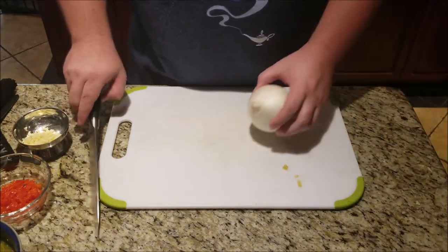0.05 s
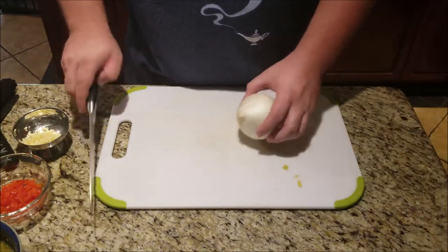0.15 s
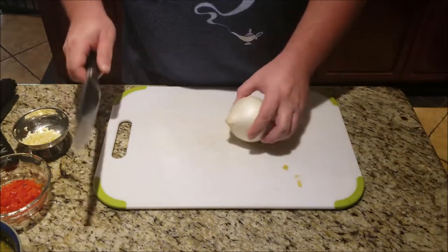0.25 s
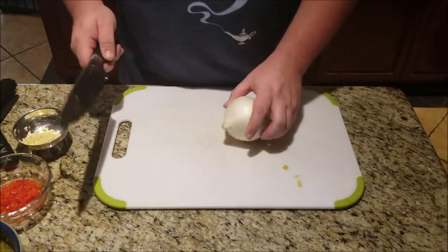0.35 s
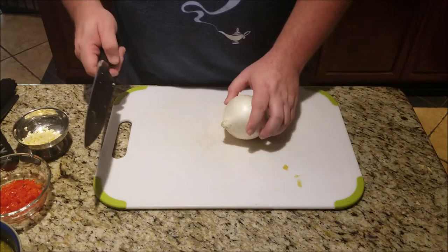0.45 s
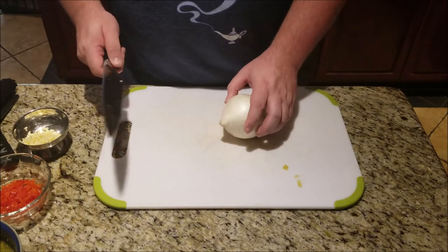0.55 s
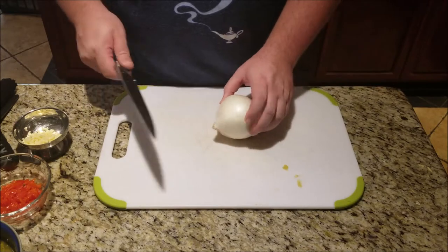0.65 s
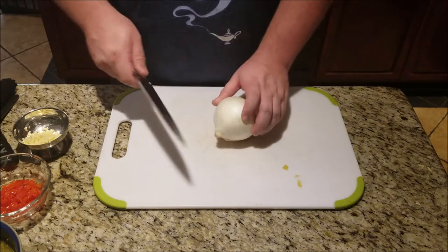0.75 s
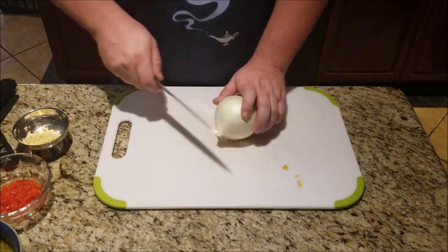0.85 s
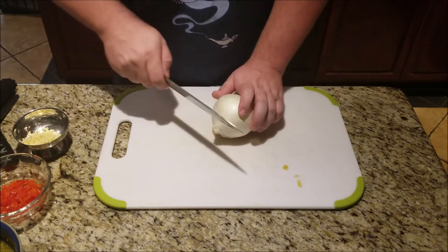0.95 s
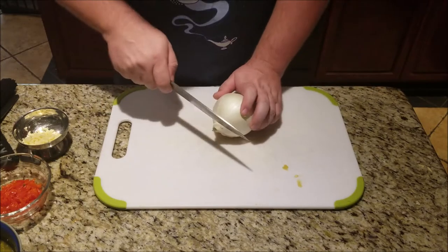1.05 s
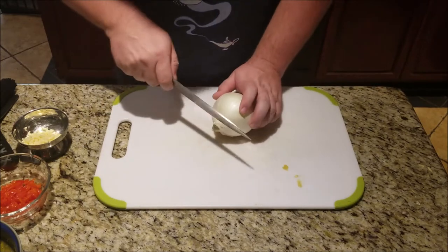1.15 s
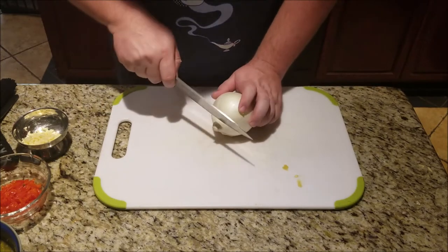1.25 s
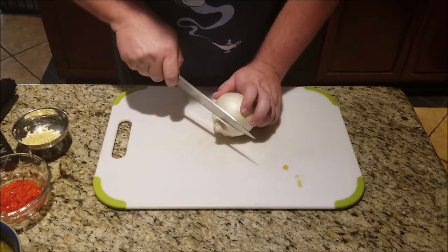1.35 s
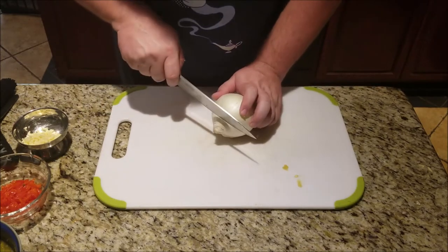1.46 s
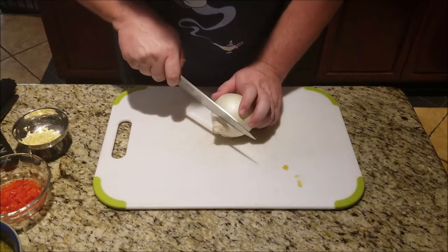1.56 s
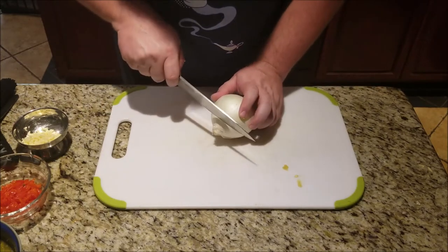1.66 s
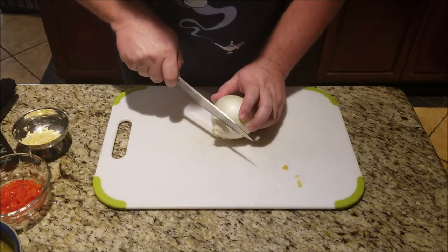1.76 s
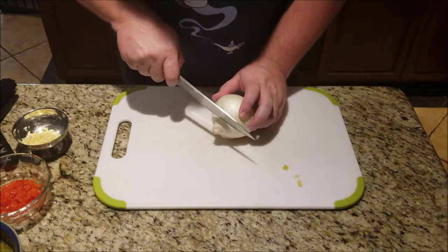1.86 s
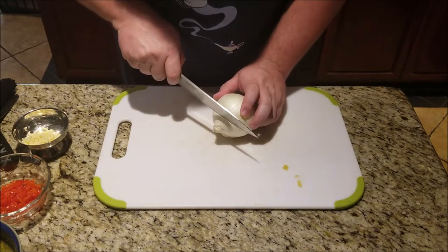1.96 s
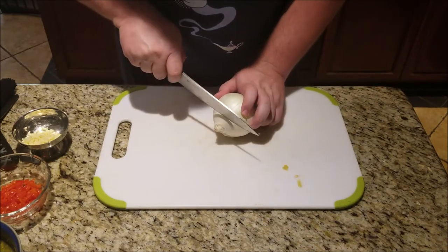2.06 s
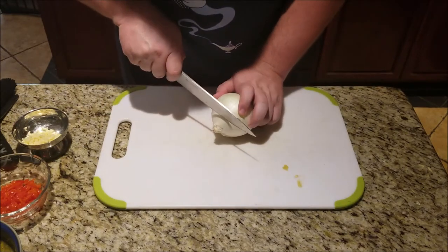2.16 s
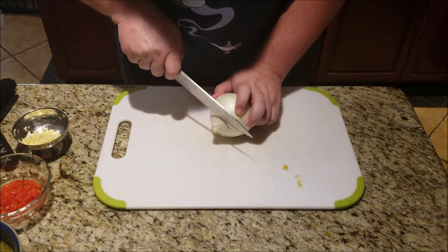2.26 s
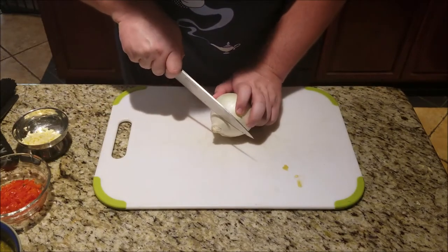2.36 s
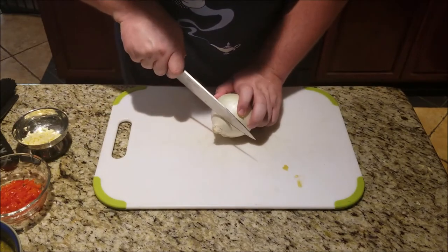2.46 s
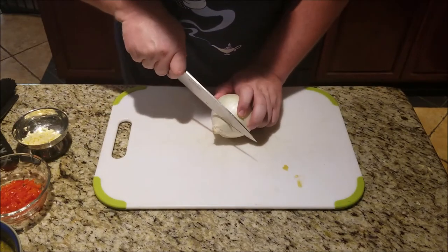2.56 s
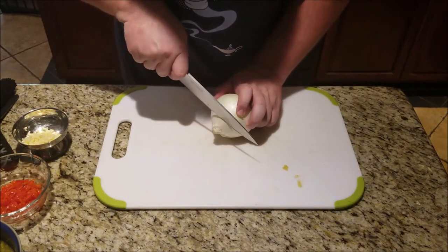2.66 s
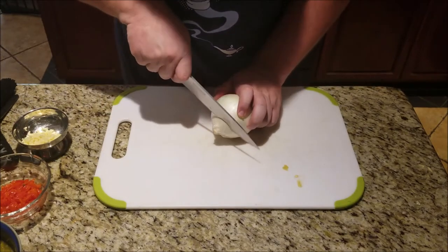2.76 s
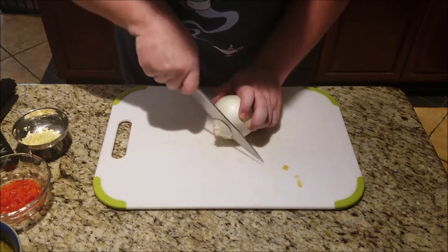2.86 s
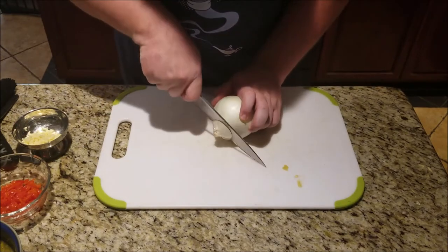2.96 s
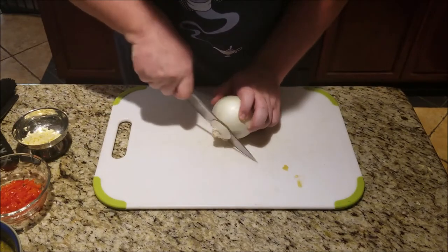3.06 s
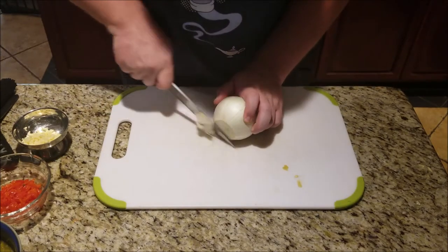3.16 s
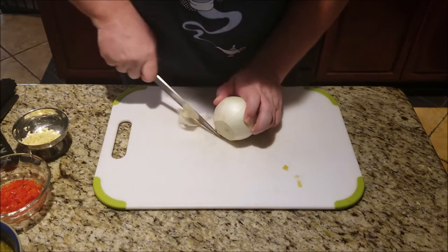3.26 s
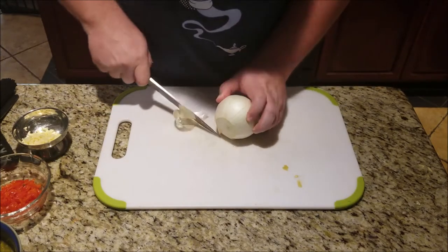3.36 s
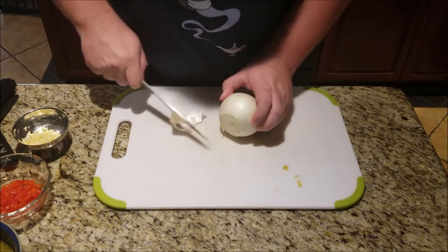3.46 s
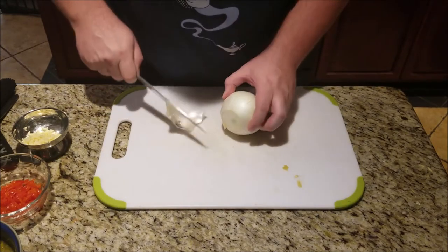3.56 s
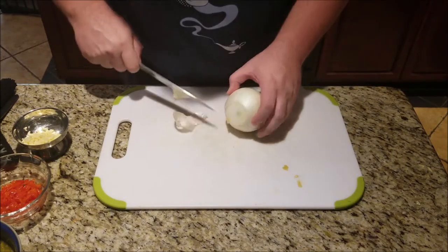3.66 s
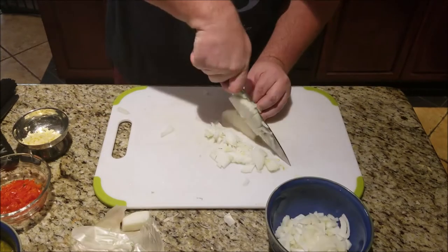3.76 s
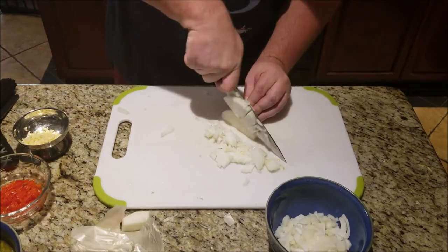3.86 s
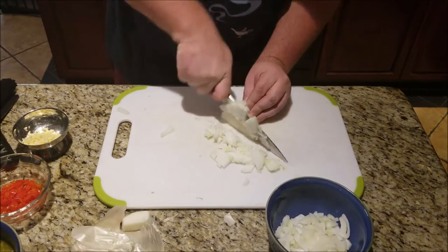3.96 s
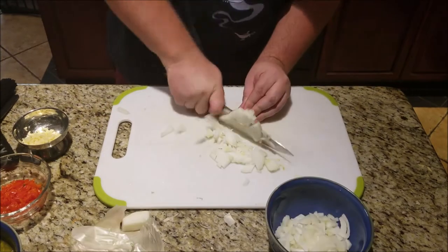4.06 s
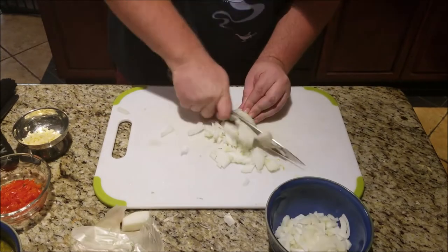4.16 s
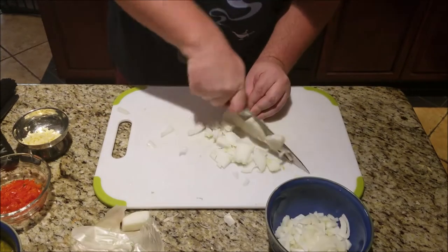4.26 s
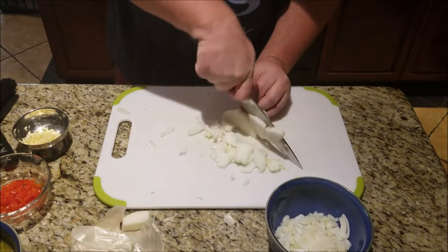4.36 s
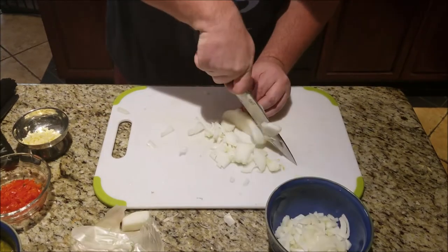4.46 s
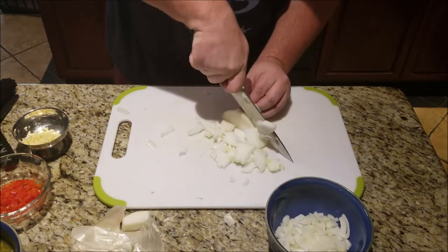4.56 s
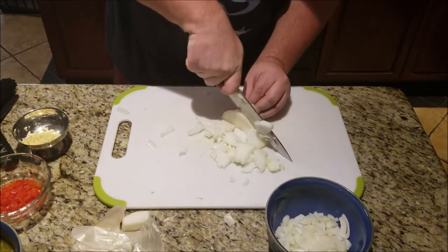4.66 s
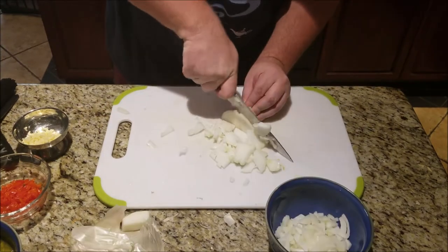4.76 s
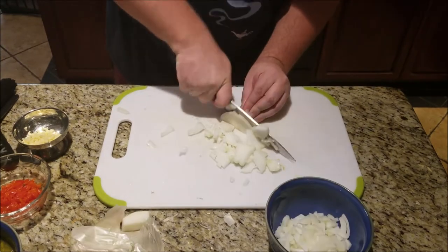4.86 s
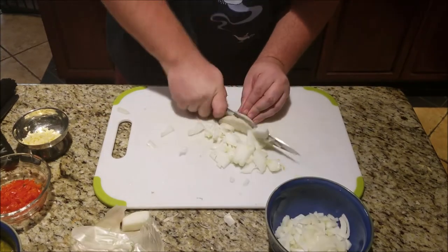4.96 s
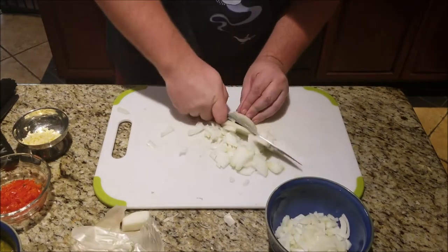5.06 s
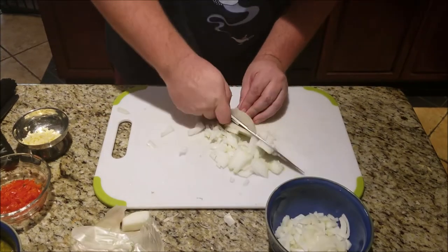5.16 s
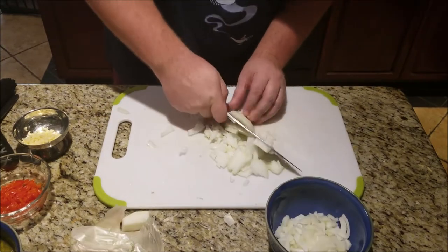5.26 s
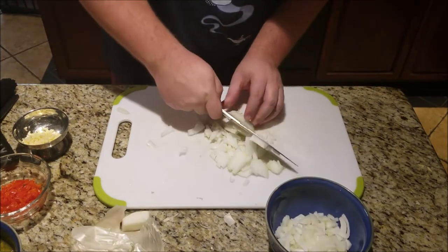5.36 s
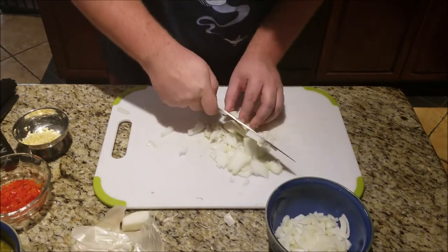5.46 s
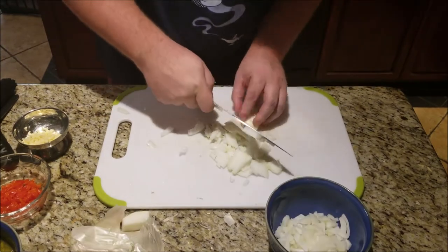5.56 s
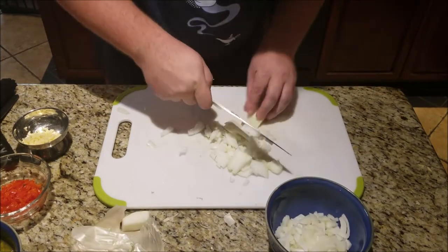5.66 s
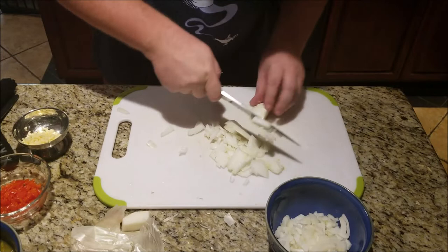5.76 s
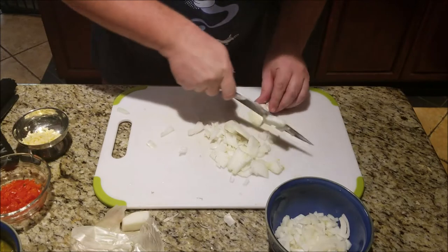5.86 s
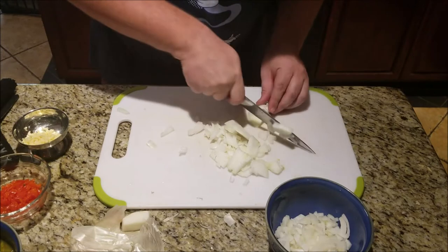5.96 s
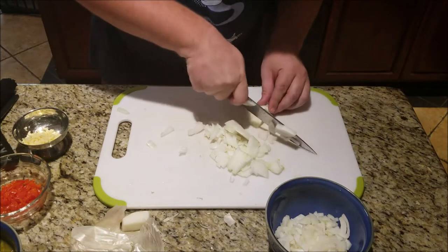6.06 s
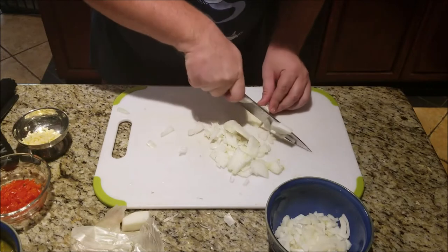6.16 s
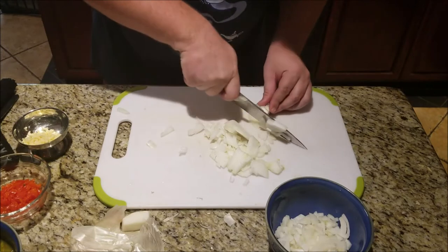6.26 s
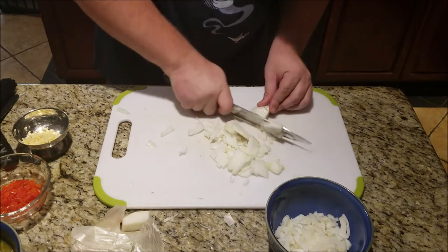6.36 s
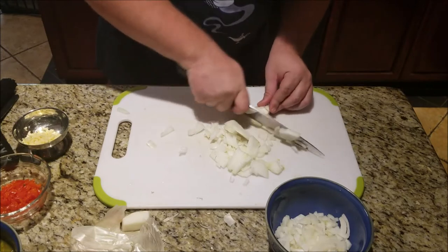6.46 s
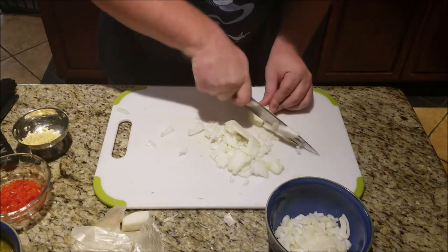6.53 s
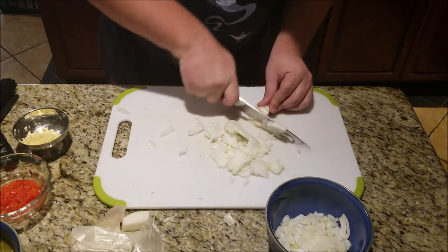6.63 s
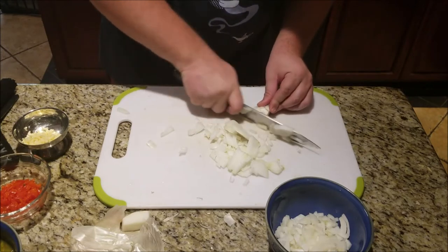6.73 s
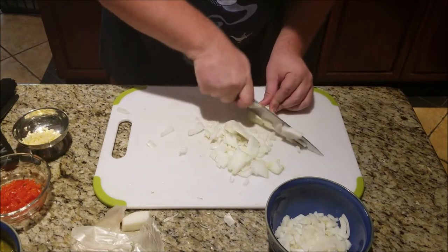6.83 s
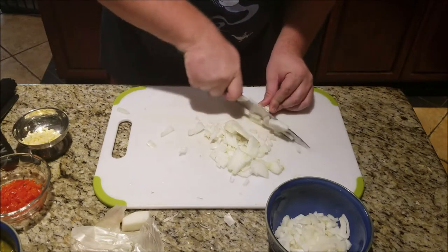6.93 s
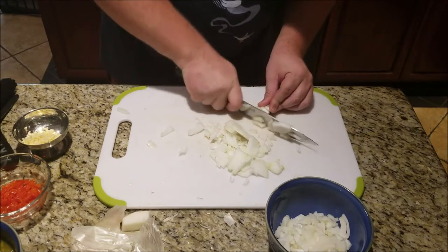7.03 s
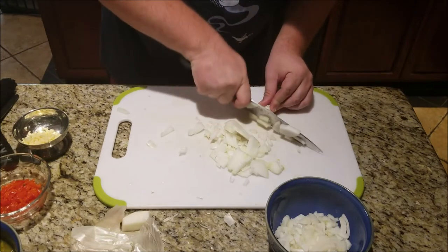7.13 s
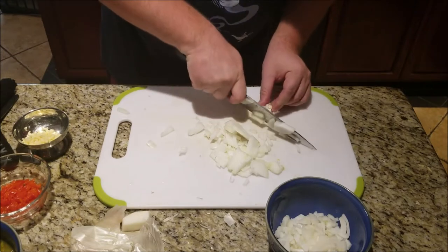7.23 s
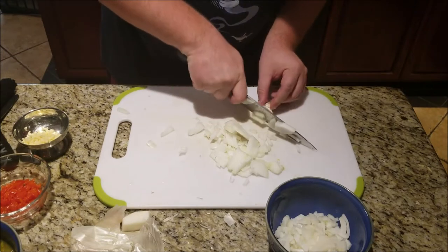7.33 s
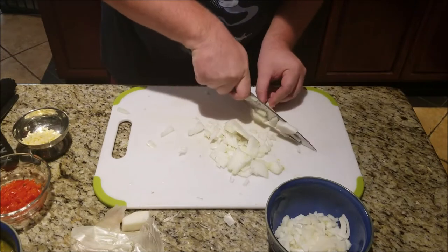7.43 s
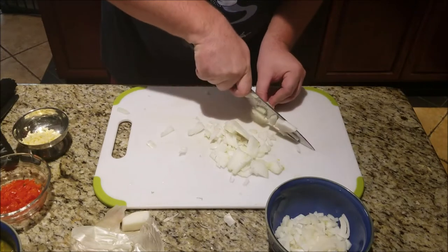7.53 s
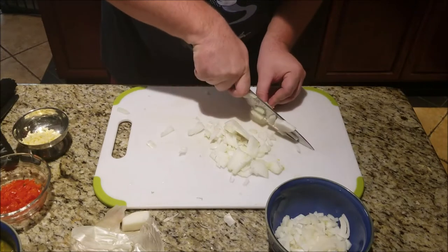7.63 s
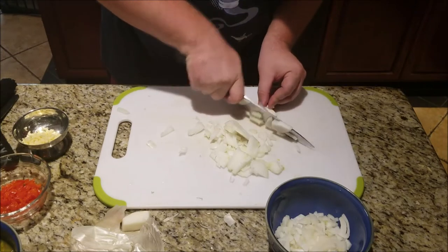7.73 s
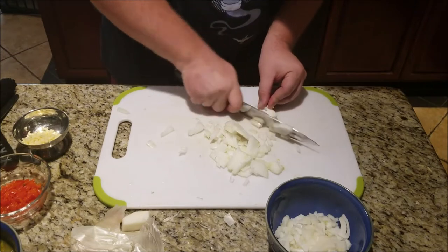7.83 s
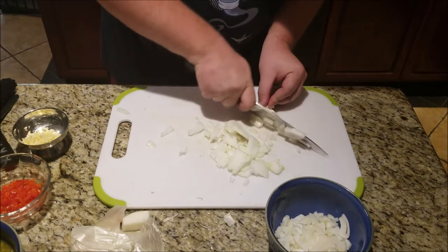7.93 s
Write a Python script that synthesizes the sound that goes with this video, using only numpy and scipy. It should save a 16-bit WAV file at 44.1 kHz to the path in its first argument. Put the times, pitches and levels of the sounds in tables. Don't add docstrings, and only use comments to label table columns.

```python
import sys
import numpy as np
from scipy import signal
from scipy.fft import rfft, irfft, next_fast_len
from scipy.io import wavfile
from scipy.ndimage import uniform_filter1d

SR = 44100
rng = np.random.default_rng(int(sys.argv[2]) if len(sys.argv) > 2 else 0)


def invert_db(level):
    return 10 ** (np.asarray(level, dtype=float) / 20)


def master(y):
    cut = np.clip(np.atleast_2d(y).T, -1, 1)
    pcm = np.round(cut * 32767)
    wavfile.write(sys.argv[1], SR, pcm.astype(np.int16))


N = 352447
T = np.arange(N) / SR

# [f/Hz, level/dB as the tip drags, level/dB as the heel lifts off, t60/s]
BLADE_MODES = [(4597, -14, -13, 0.43), (6140, -10, -20, 0.19), (7601, -13, -11, 0.34),
               (8860, -16, -14, 0.22), (9500, -26, -17, 0.12), (10400, -20, -10, 0.36),
               (10940, -3, 8, 0.13), (11900, -15, -1, 0.24), (12130, -1, -3, .3), (12300, 2.5, -7, .2),
               (12600, 1, 7, .2), (13870, 0, 6.5, 0.17), (14010, -4, -6, 0.48), (15270, -3, -13, .15)]
# [t/s, level/dB]
STONE_DRAG = [
    (0, -43),
    (.014, -37),
    (.022, -58),
    (.06, -52),
    (.08, -43.5),
    (.1, -75),
    (.14, -79),
]
# [t/s, level/dB]
ONION_SLIDE = [(0.0, -50), (0.14, -54.5), (0.2, -54.5), (0.74, -60), (0.79, -54.5), (0.85, -59),
               (0.92, -56), (1.04, -65.5), (1.08, -70), (1.4, -82.5), (3.0, -76.5), (3.25, -61.5),
               (3.43, -69), (3.55, -95)]
# [f/Hz, width/Hz, level/dB]
LOADED_RESONANCES = [(324.4, 33, 11.5), (448, 130, 1), (610, 45, -38.5), (900, 61, -8), (1490, 330, -10),
                     (1960, 560, -16)]
# [f/Hz, level/dB per Hz]
KITCHEN_SPECTRUM = [(15, -41), (25, -6.5), (135, -4.5), (167, -8), (197, -14), (304, -7), (726, -31.5),
                    (927, -25), (1550, -36), (3910, -37), (6900, -31), (8600, -46), (13600, -31.5),
                    (15200, -36.5), (16500, -55)]
# [f/Hz, level/dB]
FRIDGE_PARTIALS = [(48.4, -67), (118.4, -67.5), (145.3, -66), (193.8, -81.5)]
# [middle t/s, half width/s, crackle level/dB, wet crunch level/dB, board rubbing level/dB]
RUSTLES = [(.01, 0.023, -27, -44, -56), (.08, 0.049, -48, -47.5, -53), (.17, 0.054, -72, -57.5, -60),
           (.29, 0.051, -66.5, -57.5, -59.5), (.4, 0.037, -61, -62, -80), (.57, 0.075, -72, -66.5, -72.5),
           (.75, 0.1, -63.5, -63.5, -74), (.92, 0.066, -69, -59.5, -68.5), (1.07, 0.029, -63.5, -71.5, -83),
           (1.27, 0.059, -73.5, -80, -89), (1.41, 0.038, -75, -83, -89), (1.62, 0.064, -68.5, -73.5, -97),
           (2.04, 0.063, -73, -75, -82), (2.25, 0.078, -68, -74, -85), (2.52, 0.092, -66.5, -68.5, -83.5),
           (2.648, 0.017, -43.5, -45, -80.5), (2.743, 0.012, -49, -48.5, -68.5),
           (2.885, 0.018, -33, -32.5, -50), (3.09, 0.018, -21, -27, -67.5),
           (3.28, 0.045, -60.5, -47.5, -68), (3.399, 0.066, -67, -62, -74.5)]
# [middle t/s, half width/s, crackle level/dB, wet crunch level/dB, board rubbing level/dB]
SHUFFLES = [(3.85, 0.035, -81, -65.5, -69), (4.19, 0.048, -62.5, -56, -50.5), (4.45, 0.13, -76, -70.5, -66),
            (5.071, 0.044, -62, -51, -54), (5.166, 0.033, -64, -59.5, -60.5),
            (5.29, 0.035, -71.5, -79, -80), (5.52, 0.051, -66, -85, -66), (5.608, 0.072, -73, -75, -68.5),
            (5.679, 0.031, -66.5, -76, -80), (6.17, 0.15, -74, -59.5, -54), (6.44, 0.051, -67, -52, -51.5),
            (6.59, 0.038, -66.5, -52.5, -57), (6.798, 0.021, -83, -61, -50.5),
            (6.902, 0.042, -65, -52.5, -52.5), (7.149, 0.23, -74, -63.5, -61),
            (7.441, 0.059, -68, -77, -77), (7.56, 0.054, -80, -76, -78), (7.765, 0.019, -56.5, -65, -67),
            (7.92, 0.05, -75, -58, -54)]
# [t/s, hold/s, crackle level/dB, wet crunch level/dB, board rubbing level/dB]
CUTS = [(2.31, 0.054, -61, -64, -71), (2.573, 0.009, -50.5, -56.5, -73), (2.61, 0.056, -49, -49.5, -69.5),
        (2.751, 0.025, -32, -32.5, -54), (2.783, 0.12, -34, -39, -59), (2.885, 0.013, -33, -29, -44),
        (2.936, 0.094, -39.5, -39, -66), (3.025, 0.035, -29.5, -32.5, -50), (3.067, .13, -28.5, -30, -60),
        (3.876, 0.065, -41, -40.5, -39), (3.941, 0.11, -38, -33.5, -45.5), (4.644, 0.065, -48.5, -45, -41),
        (4.716, 0.11, -45, -37, -35), (4.818, 0.13, -41, -37.5, -43.5), (5.988, 0.0082, -63, -50, -60.5),
        (6.311, 0.043, -42, -44, -40), (6.638, 0.03, -36.5, -37, -34.5), (6.94, 0.064, -39, -38.5, -39.5),
        (7.769, 0.026, -41, -40.5, -40.5)]
RELEASE_RATES = [
    (509.5,),
    (307,),
    (295,),
]
SETTLE_LEVELS = [
    (-35,),
    (-6,),
    (-31.5,),
]
# [f/Hz, level/dB per Hz]
CELL_SPECTRUM = [(180, -60), (300, -15), (671, -8), (1480, -12.5), (2030, -5), (2240, -0.5), (2400, -0.5),
                 (6030, 0.5), (7300, -10.5), (8870, -13), (12600, 4), (15700, 0), (16500, -28)]
# [t/s, peak level/dB, top part above it/dB, left minus right/dB]
SNAPS = [(0.547, -44.5, -7, 12), (0.8105, -37, -12, 13), (1.0522, -38, -18, 13), (1.2612, -50, -1, 13),
         (1.405, -49, -5, 15), (1.5846, -44, -9, 13), (2.317, -34, -15, 14), (2.349, -32.5, -20, -3),
         (2.52, -39, -13, 8.5), (2.577, -35.5, -11.5, 9.5), (2.614, -31.5, -9.5, 1.5),
         (2.75, -28, -0.5, 14.5), (2.7558, -12.5, -7, 2.5), (2.776, -16, -10, -1.5),
         (2.827, -13.5, -13.5, 12), (2.9232, -13.5, -0.5, 8.5), (2.956, -25.5, -5, 9), (2.98, -23, -5.5, 7),
         (2.996, -28, -4, 8), (3.019, -26.5, -5.5, 6.5), (3.033, -13, -2.5, 7.5), (3.045, -15.5, -3, 7),
         (3.053, -20.5, -3.5, 9.5), (3.0667, -5.5, -4.5, 8.5), (3.0907, -19.5, -12.5, 9),
         (3.0973, -9, -3.5, 7.5), (3.1085, -12, -8.5, 8), (3.462, -31.5, -14.5, 2), (3.81, -39, -9, 12.5),
         (7.7218, -41, -14, 13)]
# [t/s, peak level/dB, top part above it/dB, left minus right/dB, mid part above it/dB]
SPLITS = [(0.28, -52, -4, 2, 1), (2.8981, -5.5, -6.5, 5, -11.5), (3.003, -19, -4, 3, -3.5),
          (3.883, -30, -9, 15, -25.5), (4.0651, -28.5, -6.5, 5, -10), (4.6505, -23, -14, 2, -12),
          (5.992, -31.5, -20, 4.5, -26), (6.3179, -33, -14, -9.5, 5.5), (6.644, -27, -11, 4, -16),
          (6.967, -27, 1, -2, 1.5), (6.9883, -11.5, -6.5, 15, -18), (7.778, -24.5, -6, -4, -1.5)]
# [t/s, peak level/dB, upper modes above it/dB, low modes above it/dB, higher of main pair above it/dB]
KNOCKS = [(0.091, -44.5, -2, 3, 0), (0.111, -40, -2, -18, -8), (0.277, -41.5, -13, -0.5, -5),
          (2.622, -50, -24.5, -15, 1.5), (2.9016, -11, -6.5, -7, 0), (3.004, -45.5, 4.5, -17.5, -3),
          (3.8755, -29, -19.5, -33, 3.5), (3.907, -25.5, -3, -28, 4), (3.925, -25.5, 1, -4.5, -17),
          (4.015, -27.5, -2, -19, -14), (4.068, -30.5, -3, -18, -1), (4.106, -32.5, -29, -12, -3),
          (4.144, -31, -25, -17, -5), (4.188, -35.5, -12, -14.5, -4), (4.243, -39.5, -20.5, -7.5, 0.5),
          (4.339, -46.5, -10, -13, 0.5), (4.525, -44.5, -21, -16, 3.5), (4.651, -34, -8, -5, -1),
          (4.72, -16, -12.5, -11.5, -0.5), (4.729, -21.5, -7, -8, 0), (4.747, -24.5, 1, -0.5, -9),
          (4.791, -32, -8, -35, 13), (4.852, -28.5, -5, -5, 6), (4.96, -33.5, 0.5, -5, 3),
          (5.06, -43, -12, -20, -20), (5.088, -38, -15, -22, -13), (5.696, -38, -36, -9.5, -0.5),
          (5.884, -55, 0, -16, 5), (5.9933, -12, -6, -15.5, -11.5), (6.315, -29.5, -3, -19, -11),
          (6.348, -33.5, -3, -21, -9), (6.402, -46, 7.5, -25, 1), (6.642, -29.5, -2, -12.5, 4),
          (6.657, -34, 10, -14, 10), (6.678, -29, 2, -20, 4), (6.94, -29.5, -2, -22, -7),
          (6.962, -17, -9, -15, 4.5), (7.0, -35, 4.5, -20, -16), (7.778, -35.5, -9, -24, -1)]
# [f/Hz, level/dB, t60/s]
BOARD_MODES = [(326, -20.5, 0.16), (365.2, -9, 0.06), (483, -10.5, 0.058), (610.2, -5, 0.16),
               (664.7, -5.5, 0.1), (742.5, -10, 0.094), (853, -16.5, 0.057), (930, -4.5, 0.036),
               (1095, -11, 0.082), (1195, -12, 0.072), (1293, -7.5, 0.04), (1516, -4.5, 0.044),
               (1650, -4.5, 0.0093), (2090, -16.5, 0.056)]
# [t/s, f/Hz, peak level/dB, t60/s]
PINGS = [(.0905, 1410, -34.5, 0.028), (0.091, 1910, -42, .05), (.0905, 2345, -41.5, .14),
         (.111, 1080, -42.5, 0.074), (.111, 520, -41.5, 0.12), (.2775, 377, -44, 0.022),
         (2.9005, 1790, -21, 0.037), (2.9005, 1082, -22.5, 0.079), (3.004, 1640, -30, .04),
         (3.906, 1052, -26, 0.072), (3.907, 800, -26, .06), (3.925, 930, -28, 0.057),
         (4.067, 970, -20.5, 0.027), (3.945, 402, -32.5, 0.085), (4.312, 633, -47.5, .08),
         (4.225, 704, -44, .05), (4.662, 625, -33, 0.056), (4.96, 1022, -35, 0.039),
         (5.11, 638, -45, 0.067), (5.15, 635, -47, .1), (5.52, 654, -51.5, 0.082), (5.582, 654, -51, 0.066),
         (5.604, 636, -51, 0.09), (5.997, 610, -23.5, 0.11), (5.996, 1491, -28, 0.094),
         (5.995, 1910, -34, 0.087), (5.995, 1094, -28, 0.12), (6.402, 960, -36.5, 0.035),
         (6.643, 950, -24, .05), (6.675, 1000, -32, .05), (3.395, 676, -58, .1), (6.9625, 1056, -20, 0.044),
         (7.806, 1010, -32.5, 0.031), (7.845, 642, -41, 0.17), (6.361, 1060, -42, 0.044),
         (2.316, 660, -63, 0.17)]
# [t/s, rocking level/dB, flexing level/dB]
THUDS = [(0.28, -34.5, -52), (2.901, -40, -37.5), (3.91, -38, -47), (4.066, -37.5, -46), (4.653, -45, -56),
         (4.745, -41, -66), (4.96, -41.5, -62), (5.994, -48, -43), (6.35, -43.5, -60), (6.673, -45.5, -57),
         (6.962, -43.5, -58.5), (7.776, -42, -51)]
# [t/s, length/s, f/Hz, level/dB]
SQUEAKS = [
    (2.138, 0.063, 2270, -74.5),
    (2.3, 0.025, 2270, -69),
    (2.34, .07, 2190, -73),
    (2.467, 0.025, 2256, -72),
    (3.424, 0.053, 2350, -82),
    (5.535, 0.097, 2770, -67),
    (7.571, 0.1, 5070, -72),
]
# [middle t/s, half width/s, level/dB]
WIPES = [
    (5.52, 0.031, -62),
    (5.595, .045, -67),
    (5.68, 0.029, -65),
]


def unit(x):
    return x / np.sqrt(np.mean(x ** 2))


def curve(rows):
    s, db = np.transpose(rows)
    return np.interp(T, s, db)


def colour(x, points):
    hz, db = np.transpose(points)
    size = next_fast_len(N)
    f = np.arange(size // 2 + 1) * SR / size + 1
    gain = invert_db(np.interp(np.log(f), np.log(hz), db))
    return irfft(rfft(x, size) * gain, size)[..., :N]


def band(x, lo_hz, hi_hz):
    return signal.sosfilt(signal.butter(2, [lo_hz, min(hi_hz, .45 * SR)], "band", fs=SR, output="sos"), x)


def ring(x, hz, t60):
    r = np.exp(-np.log(1000) / (t60 * SR))
    w = 2 * np.pi * hz / SR
    return signal.lfilter([0, r * np.sin(w)], [1, -2 * r * np.cos(w), r * r], x)


def walk(rate):
    k = int(SR / rate)
    return uniform_filter1d(np.repeat(rng.standard_normal(N // k + 1), k), k)[:N]


def relax(x, length_s):
    return signal.lfilter([1], [1, -np.exp(-1 / (length_s * SR))], x)


def blows(times, sizes, length_s):
    x = np.zeros(N)
    x[(times * SR).astype(int)] = sizes
    return relax(x, length_s)


def bell(s, width, t):
    return np.exp(-((t - s) / width) ** 2)


def mid_side(mid, side):
    return mid + np.array([[1], [-1]]) * side


def pan(x, db):
    return x * invert_db(np.array([[.5], [-.5]]) * db)


def crackle(rate, spread_db, length_s, alike):
    sizes = invert_db(spread_db * np.minimum(rng.exponential(size=N), 5))
    puffs = relax((rng.random(N) < rate / SR) * sizes, length_s)
    mid, side = rng.standard_normal((2, N))
    return puffs * mid_side(mid, (1 - alike) * side)


def kitchen():
    mid, side = colour(rng.standard_normal((2, N)), KITCHEN_SPECTRUM)
    side = .38 * side + .7 * band(side, 1200, 19000)
    air = unit(mid_side(mid, side)) * invert_db(-68.5 + 5.5 + 0.2 * walk(0.82))
    hum = sum(invert_db(db + 2.0 + 1.9 * walk(4.5)) * np.sin(2 * np.pi * hz * T) for hz, db in FRIDGE_PARTIALS)
    return pan(air + hum, 3.6)


def blade():
    t, out = T[:SR], np.zeros((2, N))
    friction = rng.standard_normal(SR) + .5 * rng.standard_normal((2, SR))
    drive = friction * invert_db(curve(STONE_DRAG)[:SR]) * (t < .14)
    for hz, tip_db, heel_db, t60 in BLADE_MODES:
        coupling = invert_db(np.where(t < .04, tip_db, heel_db) - 29.5)
        out[:, :SR] += ring(drive * coupling, hz, .56 * t60)
    return pan(out, 7.5)


def slide():
    rub = rng.standard_normal(N) * invert_db(1.3 * walk(22.7))
    body = sum(invert_db(db) * band(rub, hz - width / 2, hz + width / 2) for hz, width, db in LOADED_RESONANCES)
    return pan(unit(body) * invert_db(curve(ONION_SLIDE) - 1.5), 8.2)


def strokes():
    attack_s, sag_db_per_s, settle_db_per_s = .004, 11, 96.5
    dicing_from_s = 3.8
    t = T[::44]
    power = np.full((3, len(t)), 1e-12)
    for s, hold, *db in CUTS:
        late = np.maximum(t - s, 0)
        after = np.maximum(late - hold, 0)
        shape = invert_db(-np.array(RELEASE_RATES) * after)
        if s > dicing_from_s:
            shape = shape + invert_db(np.array(SETTLE_LEVELS) - settle_db_per_s * after)
        held_db = np.array(db)[:, None] - sag_db_per_s * np.minimum(late, hold)
        power += (invert_db(held_db) * shape * np.minimum(late / attack_s, 1)) ** 2
    for s, width, *db in RUSTLES + SHUFFLES:
        power += invert_db(db)[:, None] ** 2 * bell(s, width, t)
    return [np.interp(T, t, 10 * np.log10(p)) for p in power]


def cell_bursts():
    return colour(crackle(rate=5000., spread_db=2.8, length_s=.0004, alike=.1), CELL_SPECTRUM)


def crunch(grains, crunch_db, wet_db):
    lower_band = band(band(grains, 6200, 7800), 6200, 7800)
    crisp = unit(band(grains, 8400, 14000)) + invert_db(-8.5) * unit(lower_band)
    on_stone = np.clip((.2 - T) / .1, 0, 1)
    crisp = crisp * invert_db(crunch_db - 16 * on_stone)
    layers = ((700, 2600), (2600, 5000), (5000, 8400))
    wet = sum(band(grains, lo, hi) * invert_db(2.0 * walk(30.)) for lo, hi in layers)
    wet = unit(band(wet, 460, 8500)) * invert_db(wet_db - 3.0)
    return pan(crisp, 7) + pan(wet, 4.5)


def skins():
    dry_skin_mid_db = -28
    events = sorted([row + (dry_skin_mid_db,) for row in SNAPS] + SPLITS)
    s, peak_db, top_db, pan_db, mid_db = np.transpose(events)
    jolts = np.sign(rng.standard_normal((2, N)) + rng.standard_normal(N))
    top = band(jolts * blows(s, invert_db(peak_db + top_db + 7.5), 0.0007), 10000, 15500)
    top += band(jolts * blows(s, invert_db(peak_db - 3.5), 0.00064), 5200, 7800)
    body = band(jolts * blows(s, invert_db(peak_db + mid_db + 5.), .0015), 1500, 5000)
    side = np.clip(np.interp(T, s + .01, pan_db), 0, 12)
    return pan(top + body, side)


def rubbing(rub_db):
    slip = crackle(rate=1000., spread_db=2.2, length_s=.002, alike=1.)[0]
    rub = np.zeros(N)
    for k, (hz, db, t60) in enumerate(BOARD_MODES):
        rub_t60 = .15 if k in (3, 4) else min(t60, .04)
        rub += (-1) ** k * invert_db(db + (hz > 1150) * -6) * ring(slip, hz, rub_t60)
    rub = unit(unit(rub) * invert_db(3.1 * walk(70.)))
    rub += invert_db(-6.5) * unit(band(slip, 450, 2400))
    return rub * invert_db(rub_db)


def knocks():
    free_s, muting_s, muted_db = .013, 0.007, -11
    detune, chatter_db = .006, -38
    hz, db, t60 = np.transpose(BOARD_MODES)[:, :, None]
    t, out = T[:SR // 4], np.zeros(N + SR)
    mute = invert_db(muted_db * np.clip((t - free_s) / muting_s, 0, 1))
    chances = rng.standard_normal((len(KNOCKS), 3, len(BOARD_MODES), 1))
    for (s, peak_db, upper_db, lower_db, pair_db), chance in zip(KNOCKS, chances):
        share_db = np.where(hz > 900, upper_db + 4.5, np.where(hz < 500, lower_db + 7, 0.))
        share_db[4] = pair_db
        share_db += (hz > 1280) * min(.9 * (peak_db + 14), 0)
        sense = np.sign(chance[0])
        sense[3:5, 0] = 1, -1
        size = sense * invert_db(peak_db + share_db + db + 1.5 * chance[1])
        phase = 2 * np.pi * hz * (1 + detune * chance[2]) * t
        modes = np.sum(size * invert_db(-60 * t / t60) * np.sin(phase), axis=0)
        push = .12 * np.exp(-t[:800] / .0002)
        push += invert_db(chatter_db) * rng.standard_normal(800) * np.exp(-t[:800] / .006)
        start = int((s - .0012) * SR)
        out[start:start + len(t)] += mute * signal.fftconvolve(modes, push)[:len(t)]
    return out[:N]


def pings():
    t, out = T[:SR // 4], np.zeros(N + SR)
    for s, hz, db, t60 in PINGS:
        start = int(s * SR)
        out[start:start + len(t)] += invert_db(db - 60 * t / t60) * np.sin(2 * np.pi * hz * t)
    return out[:N]


def thuds():
    s, rock_db, flex_db = np.transpose(THUDS)
    rocking = band(ring(blows(s, invert_db(rock_db - 40.), 0.0037), 93., 0.2), 45, 150)
    flexing = ring(blows(s, invert_db(flex_db - 25), .0005), 235, 0.049)
    return rocking + flexing


def board(rub_db):
    s, peak_db, upper_db = np.transpose(KNOCKS)[:3]
    s = s - .0012
    chatter = rng.standard_normal(N)
    rough = chatter * blows(s, invert_db(peak_db + upper_db / 2 - 2.5), 0.023)
    rough = band(band(rough, 700, 2500), 500, 2100)
    tick_db = 1.6 * np.minimum(peak_db + 12, 0) - 14 - 13
    tick = np.sign(chatter) * blows(s, invert_db(tick_db), 0.0067)
    tick = band(band(tick, 4400, 6200), 2800, 7000)
    plate = knocks() + pings() + rough + rubbing(rub_db)
    return pan(band(plate, 260, 3500) + tick, 4.0) + pan(thuds(), 3.6)


def squeaks():
    noise, out = rng.standard_normal((2, N)), np.zeros((2, N))
    for s, length, hz, db in SQUEAKS:
        part = slice(int((s - 2 * length) * SR), int((s + 2 * length) * SR))
        whistle = unit(band(noise[:, part], hz - 70, hz + 70))
        out[:, part] += whistle * invert_db(db) * bell(s, length / 2, T[part])
    return pan(out, 4.5)


def wipes(grains):
    hiss = unit(band(band(grains, 2200, 8000), 2000, 10000))
    power = sum(invert_db(db) ** 2 * bell(s, width, T) for s, width, db in WIPES)
    return pan(hiss * np.sqrt(power), 4.5)


def echoes(x):
    room_t60_s, treble_t60_s = 0.37, 0.29
    t = T[:int(.7 * SR)]
    mid, side = rng.standard_normal((2, len(t)))
    noise = mid_side(mid, .6 * side + .6 * band(side, 1200, 19000))
    bass = band(noise, 23, 3600) * invert_db(-60 * t / room_t60_s)
    treble = band(noise, 5000, 23000) * invert_db(-60 * t / treble_t60_s)
    tail = (bass + treble) * np.clip(t / 0.012, 0, 1)
    tail = tail / np.sqrt(np.sum(tail ** 2) / 2)
    return signal.fftconvolve(x[None], tail, axes=1)[:, :N]


def scene():
    crunch_db, wet_db, rub_db = strokes()
    grains = cell_bursts()
    airy = blade() + slide() + crunch(grains, crunch_db, wet_db) + skins() + squeaks() + wipes(grains)
    airy = airy + invert_db(-5.5) * band(airy, 6600, 7200)
    plate = board(rub_db)
    send = (airy + plate * invert_db(-3.5)).mean(axis=0)
    return airy + plate + pan(echoes(send) * invert_db(-5), 7.5) + kitchen()


def band_limit(x):
    return signal.sosfilt(signal.butter(12, 16860, fs=SR, output="sos"), x)


def record(dry):
    low_pass = signal.ellip(8, .2, 30, 15900, fs=SR, output="sos")
    mix = signal.sosfilt(low_pass, dry)
    return band_limit(mix)


dry = scene()
out = record(dry)
master(out)
```